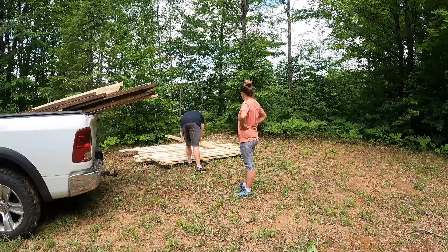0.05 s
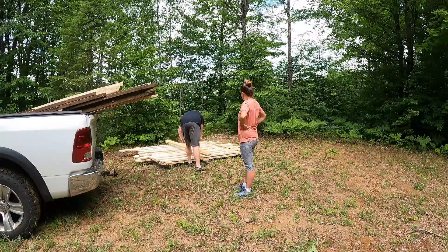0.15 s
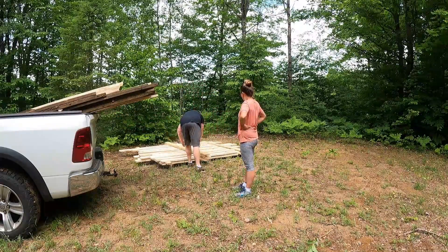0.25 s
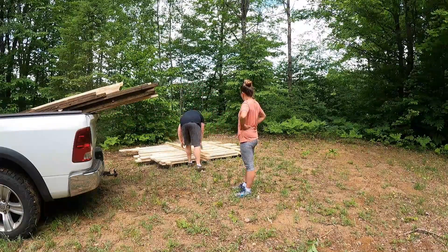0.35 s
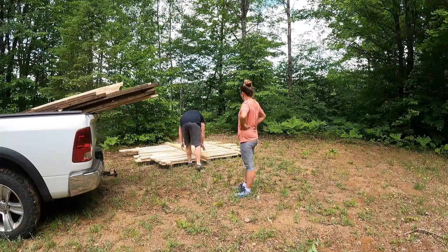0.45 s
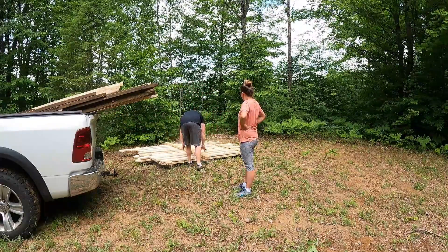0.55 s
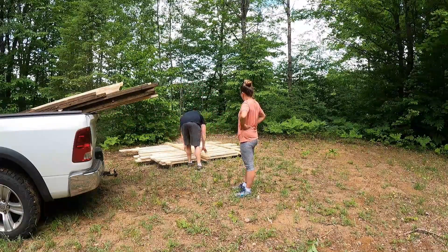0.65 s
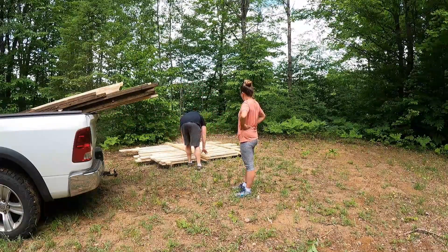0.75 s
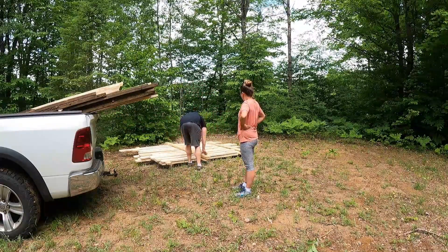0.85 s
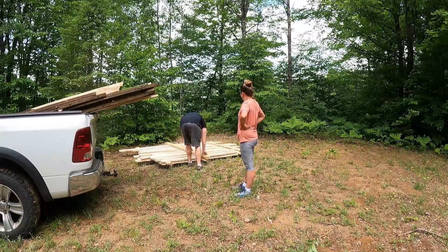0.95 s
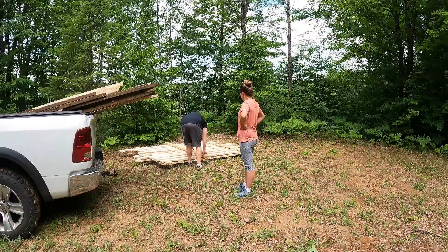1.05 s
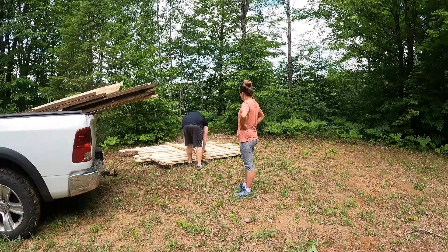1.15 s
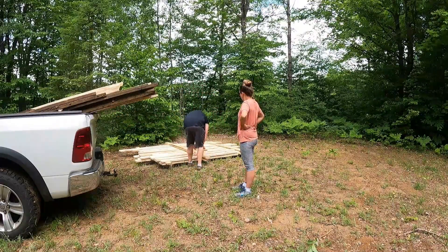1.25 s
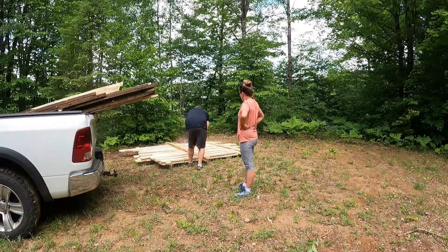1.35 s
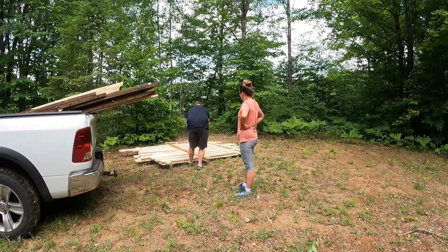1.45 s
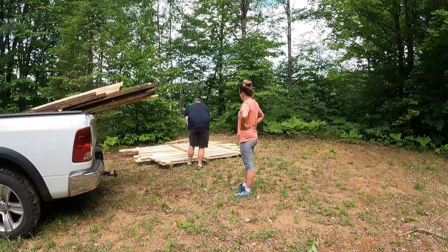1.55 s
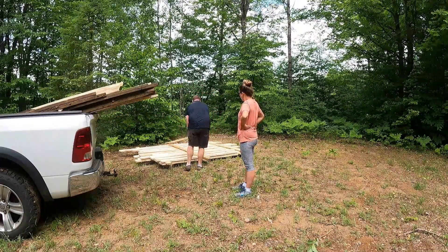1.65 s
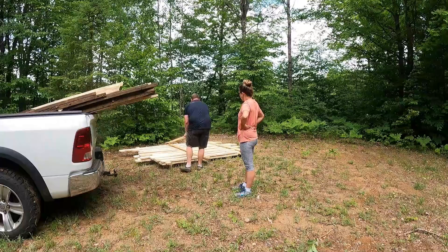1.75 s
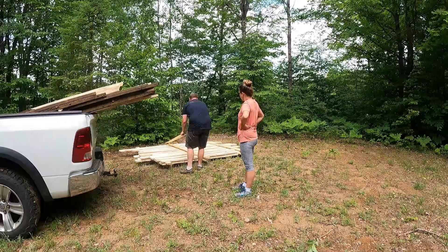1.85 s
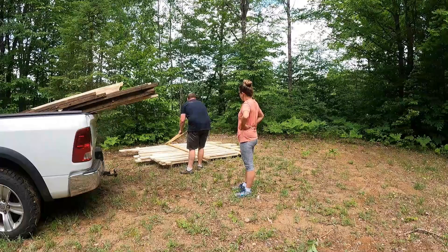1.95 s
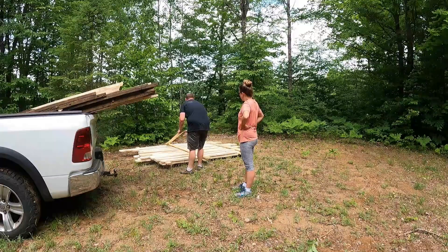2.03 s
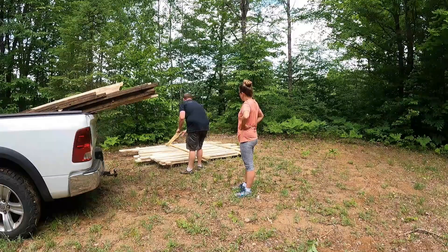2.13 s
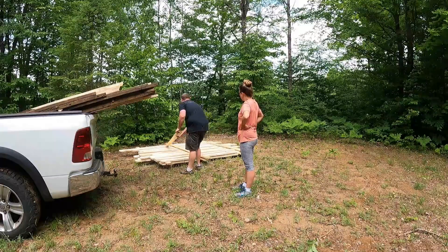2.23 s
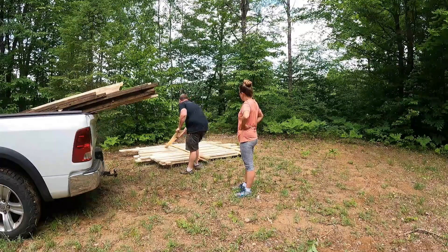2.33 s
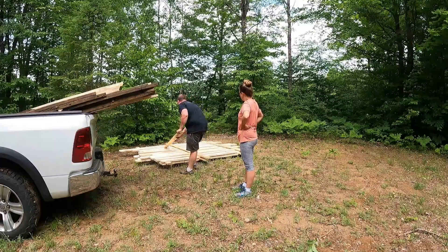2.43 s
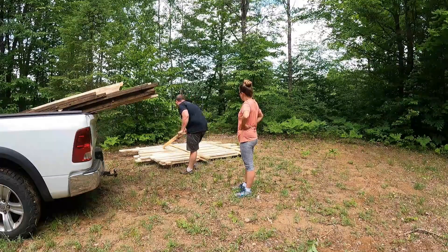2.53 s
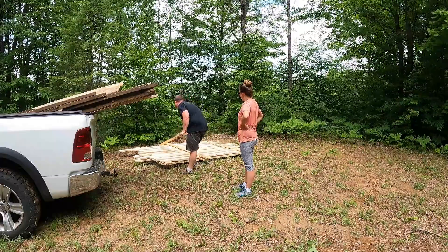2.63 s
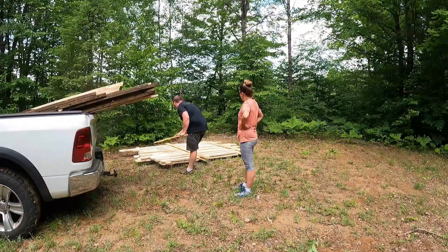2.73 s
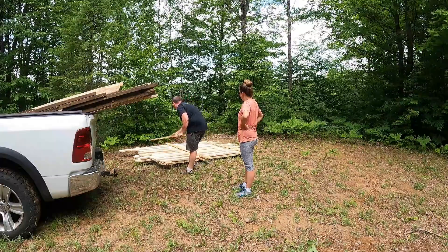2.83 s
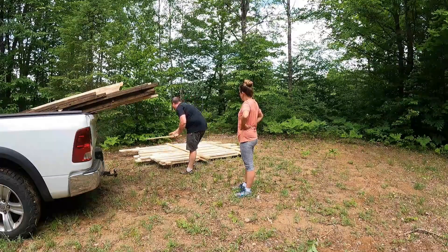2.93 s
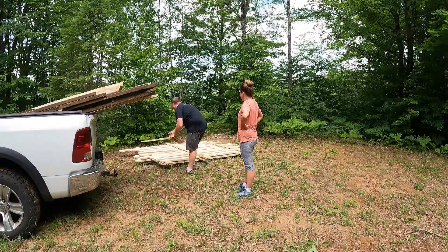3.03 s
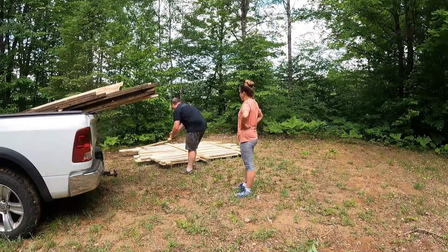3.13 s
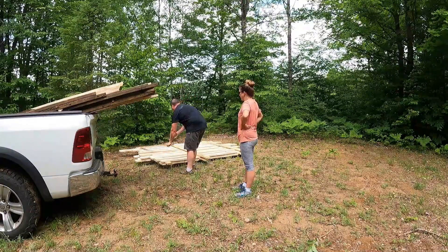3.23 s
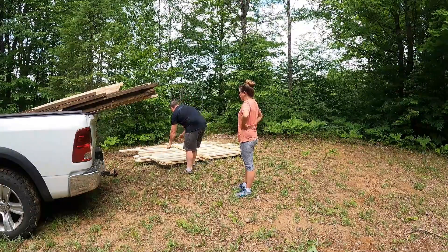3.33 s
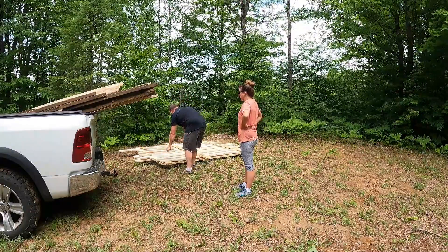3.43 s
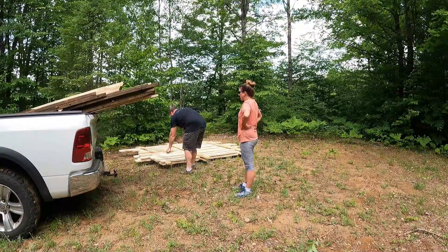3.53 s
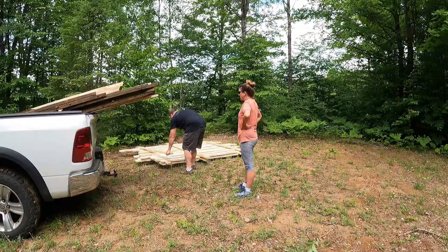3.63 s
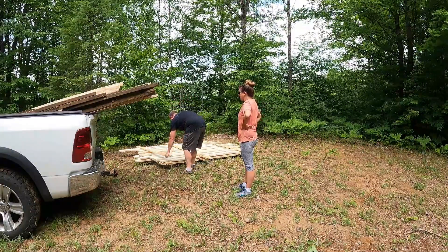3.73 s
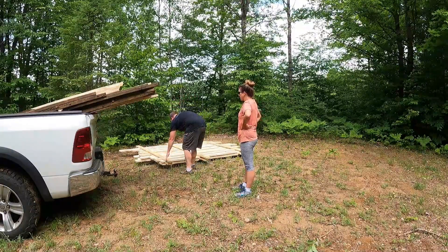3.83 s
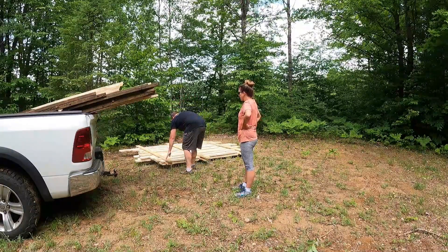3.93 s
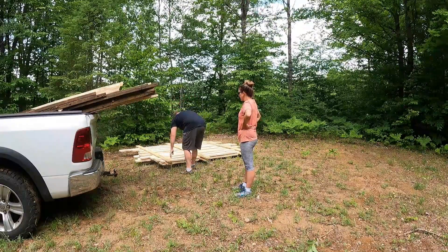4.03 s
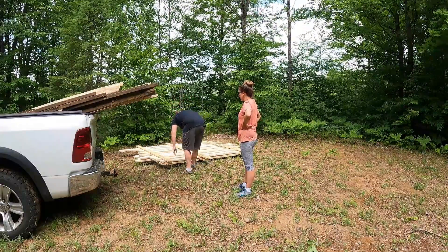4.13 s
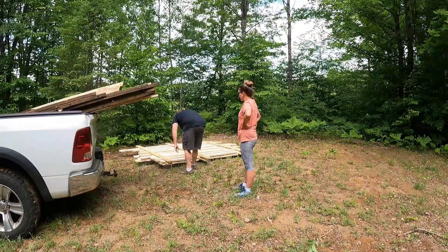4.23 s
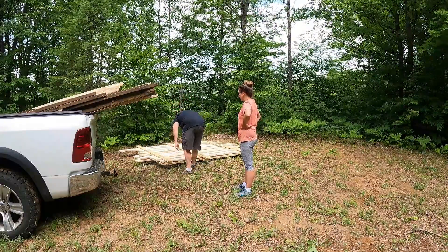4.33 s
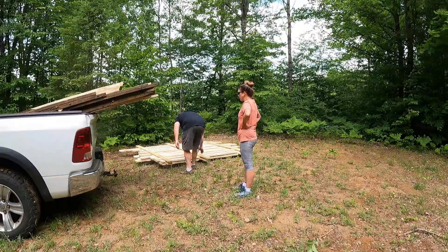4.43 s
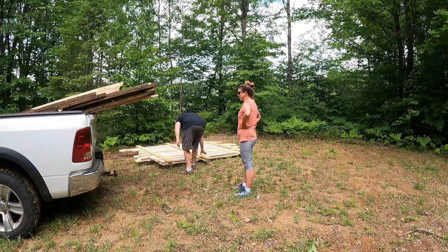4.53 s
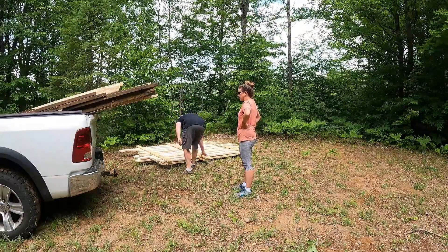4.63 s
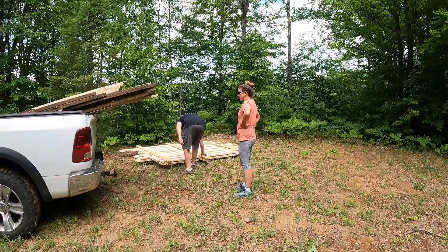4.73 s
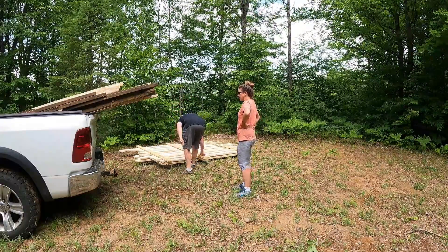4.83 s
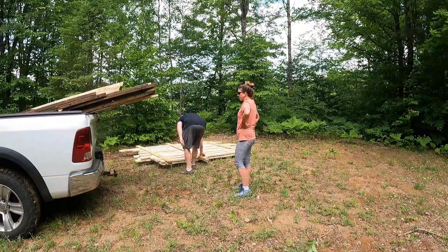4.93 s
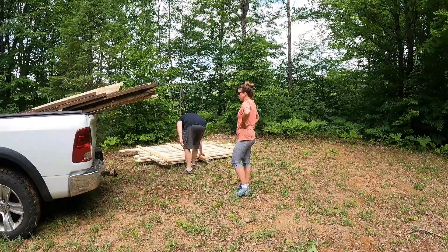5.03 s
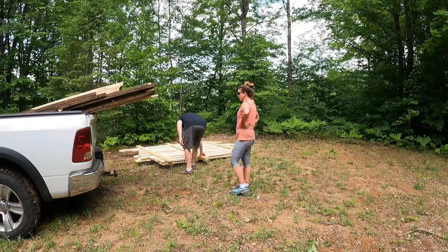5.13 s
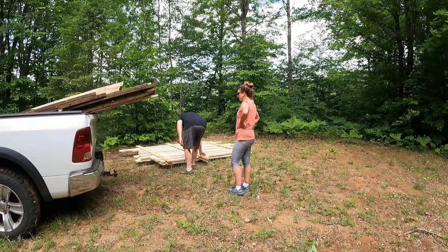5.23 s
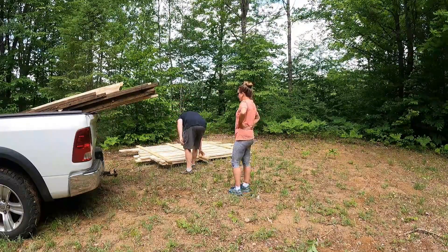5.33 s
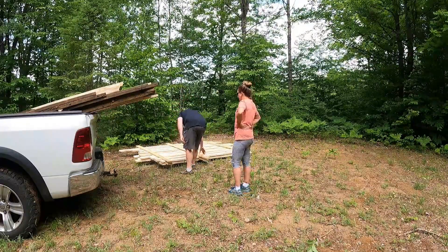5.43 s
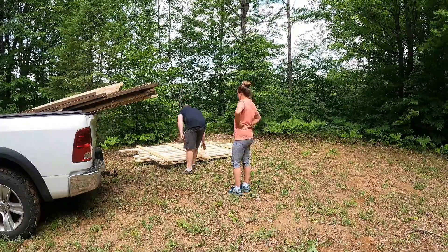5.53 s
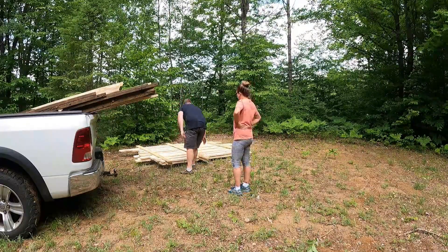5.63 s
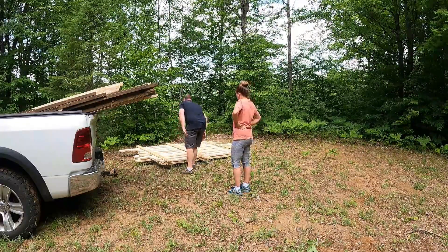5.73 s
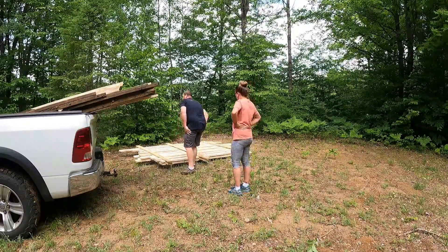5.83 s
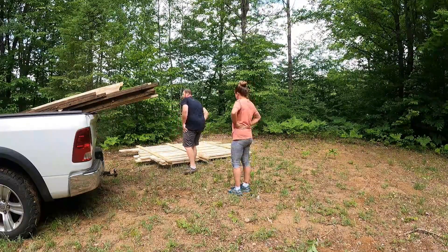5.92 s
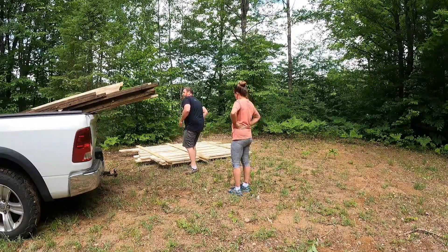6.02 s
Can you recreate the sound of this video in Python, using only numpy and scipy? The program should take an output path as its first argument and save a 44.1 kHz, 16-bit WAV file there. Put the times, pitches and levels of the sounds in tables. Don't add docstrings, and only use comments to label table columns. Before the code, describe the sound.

Rough boards clatter hard onto a wooden stack in a forest clearing, then scrape, knock and settle over soft leaf hiss.

```python
import sys
import numpy as np
from scipy import signal
from scipy.fft import rfft, irfft, next_fast_len
from scipy.io import wavfile
from scipy.ndimage import uniform_filter1d

SR = 44100
rng = np.random.default_rng(int(sys.argv[2]) if len(sys.argv) > 2 else 0)


def materialize(psi):
    bounded = np.clip(np.atleast_2d(psi).T, -1, 1)
    quanta = np.round(bounded * 32767).astype(np.int16)
    wavfile.write(sys.argv[1], SR, quanta)


def decibels_to_gain(level_db):
    exponent = np.asarray(level_db, float) / 20
    return 10 ** exponent


N = 267863
T = np.arange(N) / SR


def unit(x):
    return x / np.sqrt(np.mean(x ** 2))


def spread(mid, side):
    return mid + side * np.array([[1], [-1]])


def band(x, hz, width_hz):
    n = next_fast_len(x.shape[-1], real=True)
    f = np.arange(n // 2 + 1) * SR / n + 1e-3
    response = 1 / (1 + 1j * (f - hz ** 2 / f) / width_hz)
    return irfft(rfft(x, n) * response, n)[..., :x.shape[-1]]


def colour(x, table):
    n = next_fast_len(x.shape[-1], real=True)
    f = np.arange(n // 2 + 1) * SR / n + 1
    hz, db = np.transpose(table)
    gain = decibels_to_gain(np.interp(np.log(f), np.log(hz), db))
    return irfft(rfft(x, n) * gain, n)[..., :x.shape[-1]]


def walk(rate_hz):
    k = int(SR / rate_hz)
    steps = np.repeat(rng.standard_normal(N // k + 1), k)
    return unit(uniform_filter1d(uniform_filter1d(steps, k), k)[:N])


def grains(rate_hz, spread_db):
    hits = rng.random(N) < rate_hz / SR
    return unit(hits * rng.standard_normal(N) * decibels_to_gain(spread_db * rng.exponential(size=N)))


def ring(modes, chance, rise_s, size=12000):
    t = np.arange(size) / SR
    hz, db, t60_s = (column[:, None] for column in np.transpose(modes))
    share, detune = chance[:2 * len(hz)].reshape(2, -1, 1)
    tones = np.sin(2 * np.pi * hz * (1 + 0.019 * detune) * t)
    waves = share * decibels_to_gain(db) * tones * np.exp(-np.log(1000) * t / t60_s)
    return waves.sum(axis=0) * (1 - np.exp(-t / rise_s)) ** 2


def add(out, start_s, sound, peak_db):
    i = int(start_s * SR)
    out[i:i + len(sound)] += (sound * decibels_to_gain(peak_db) / np.abs(sound).max())[:len(out) - i]


DUCK_S, DUCK_DB, DUCK_RECOVER_S = 0.4, -13.5, 0.74


def duck_db():
    return DUCK_DB * (T > DUCK_S) * np.exp(-np.maximum(T - DUCK_S, 0) / DUCK_RECOVER_S)


# freq_hz, density_db
HISS_COLOUR = [(260, -22), (450, -10), (484, -11), (566, -8), (636, -7.5), (683, -3), (823, -7.5),
               (1300, 0.5), (1420, -0.5), (2960, -4.5), (5500, -1), (7330, -10), (9100, -20), (12000, -27),
               (14000, -43.5)]
# freq_hz, gain_db
AIR_WIDTH = [(60, -21.5), (110, -14), (200, -9), (370, -6.5), (670, -6.5), (1220, -7), (2230, -5),
             (4070, -7), (7420, -14), (13600, -4)]
# freq_hz, density_db
RUMBLE_SPECTRUM = [(15, -35.5), (25, -8.5), (81, -1), (95, -1), (114, -13.5), (145, 0), (199, -2.5),
                   (263, -7.5), (479, -17), (600, -21), (780, -52.5), (1320, -120)]
# time_s, level_db
RUMBLE_LEVEL = [(0, -61.5), (.4, -60), (1.3, -66.5), (4, -60.5), (5, -63), (6.07, -61.5)]
HISS_DB, BREEZE_DB_PER_S = -63, 0.3446


def air():
    mid, side = rng.standard_normal((2, N))
    both = spread(mid, colour(side, AIR_WIDTH))
    hiss_db = HISS_DB + BREEZE_DB_PER_S * T + duck_db() + 4.0 + 0.5 * walk(26.0)
    rumble_db = np.interp(T, *np.transpose(RUMBLE_LEVEL)) + 2.0 + 0.55 * walk(13)
    return unit(colour(both, HISS_COLOUR)) * decibels_to_gain(hiss_db) + unit(colour(both, RUMBLE_SPECTRUM)) * decibels_to_gain(rumble_db)


# peak_s, peak_db
FOOT_SHIFTS = [
    (1.86, -77.5),
    (2.48, -72.5),
    (3.36, -78),
    (5.38, -76),
]
SCUFF_REST_DB, SCUFF_RISE_DB_PER_S, SCUFF_FALL_DB_PER_S = -88.5, 76, 64


def scuff():
    steps = 0
    for peak_s, peak_db in FOOT_SHIFTS:
        fall_db = np.maximum(SCUFF_RISE_DB_PER_S * (peak_s - T), SCUFF_FALL_DB_PER_S * (T - peak_s))
        steps = steps + decibels_to_gain(peak_db - fall_db)
    mid, side = [unit(band(band(grains(5000, 1.8), 9300, 5000), 9640, 6000)) for _ in range(2)]
    return (steps + decibels_to_gain(SCUFF_REST_DB + duck_db())) * decibels_to_gain(-6.5) * spread(mid, 0.65 * side)


# start_s, peak_db, ring_hz, rebound_gap_s
TOUCHDOWNS = [(.368, -34.5, 940, 0.0052), (0.3837, -2.5, 1400, 0.0034), (.3921, -2, 1070, 0.0047),
              (0.4041, -2.5, 1493, 0.0023), (0.414, -13.5, 940, .012), (.4554, -20, 1830, .015),
              (0.5279, -12, 1012, 0.0042), (0.55, -12.5, 1230, .012), (.585, -21.5, 1184, .012),
              (0.6147, -19, 1380, .003), (.6228, -7, 1526, .006), (0.6397, -11.5, 1045, .0065),
              (0.671, -18, 1090, .006), (0.699, -41, 1120, 0.0085), (0.7356, -23, 1457, 0.048),
              (1.655, -43.5, 498, 0.0051), (2.3759, -30, 1250, 0.0021), (2.3951, -22, 982, 0.0064),
              (2.4235, -21.5, 890, 0.0064), (2.49, -43, 970, .034), (2.592, -43, 1615, .037),
              (3.3411, -11.5, 1100, 0.0025), (3.3608, -14.5, 1100, 0.00201), (3.3812, -15.5, 1030, 0.0042),
              (3.3925, -16.5, 1026, 0.019), (3.4748, -28, 960, 0.011), (3.5416, -40, 810, .01),
              (4.038, -18, 1336, .003), (4.0473, -17, 934, 0.0072), (4.062, -26.5, 543, .012)]
# from_s, crack_db (over peak), thud_db, ring_t60_s, rebound_loss_db
BOARDS_HANDLED = [
    (0, -26, -34, .03, -4),
    (.38, -11, -27, 0.022, 1.5),
    (.5, -16, -30, 0.027, 0),
    (.61, -16, -34, 0.027, 1.5),
    (1.6, -9, -55, 0.058, -3.5),
    (2.3, -18, -31, 0.031, 3.5),
    (3.3, -15.5, -25.5, 0.034, 5.5),
    (4, -42, -26.5, .02, 4.5),
]
CRACK_LOSS_DB_PER_S = 150
THUD_FOLLOWS = 0.43
REBOUND_LOSS_DB_PER_S, REBOUND_SHRINK, REBOUND_DETUNE, REBOUND_CRACK_DB = 150, 0.9, 0.14, -2


def contacts():
    rows = []
    for (start_s, db, hz, gap_s), c in zip(TOUCHDOWNS, rng.standard_normal((len(TOUCHDOWNS), 3))):
        board = [b for b in BOARDS_HANDLED if b[0] <= start_s][-1]
        from_s, board_crack_db, thud_db, t60_s, loss_db = board
        first_s = min(knock[0] for knock in TOUCHDOWNS if knock[0] >= from_s)
        bedded_db = board_crack_db - CRACK_LOSS_DB_PER_S * (start_s - first_s)
        for k, late_s in enumerate((0, gap_s, gap_s * (1 + REBOUND_SHRINK))):
            peak_db = db - k * loss_db - late_s * REBOUND_LOSS_DB_PER_S
            ring_hz = hz * np.exp(REBOUND_DETUNE * c[k] * (k > 0))
            crack_db = bedded_db + k * REBOUND_CRACK_DB
            rows.append((start_s + late_s, peak_db, ring_hz, crack_db,
                         thud_db - (1 - THUD_FOLLOWS) * peak_db, t60_s))
    return rows


# freq_hz, level_db, t60_s
BOARD_MODES = [(553.5, -3.5, 0.11), (643, 2, .07), (765, -8, .06), (940, 1.5, 0.097), (1083.5, -5.5, 0.15),
               (1183, -6, 0.042), (1280, -8, 0.041), (1368, -12.5, 0.088), (1606, 8, 0.03),
               (1787, -4, 0.027), (2096, -7.5, 0.065), (2250, -2.5, 0.037), (2635, -5.5, 0.056),
               (3820, -12.5, 0.042)]
# freq_hz, level_db, t60_s
PILE_MODES = [(71.7, -15.5, 0.36), (135, -7, 0.22), (158.7, -3, 0.17), (176, -5.5, 0.13), (219.2, -1, 0.11),
              (260, -1.5, 0.1), (312.2, -1.5, 0.16), (365.3, -2, 0.085), (439.4, -2.5, 0.06)]
DULL_PER_OCTAVE = 0.259
CONTACT_S, SOFTENING = 0.00014, 0.38


def knocks():
    out = np.zeros(N)
    rows = contacts()
    crack_t = np.arange(1024)
    crack_shape = crack_t * np.exp(-crack_t / SR / 0.0017)
    for (start_s, db, hz, crack_db, thud_db, t60_s), c in zip(rows, rng.standard_normal((len(rows), 1100))):
        t60_s = np.clip(t60_s, 0.008, 0.2)
        local = [(hz, 0, t60_s), (hz * 1.23, -5, 0.92 * t60_s), (hz * 0.76, -11, 1.1 * t60_s),
                 (hz * 1.6, -12, 0.84 * t60_s), (hz * 0.527, -17, 1.5 * t60_s), (hz * 1.4, -12, 0.7 * t60_s)]
        rise_s = CONTACT_S * decibels_to_gain(-SOFTENING * max(crack_db, -32))
        add(out, start_s, ring(local, 1 + 0.29 * c, rise_s, size=4096), db - 5.5)
        board = []
        for f, level_db, decay_s in BOARD_MODES:
            octaves = np.log2(f / hz)
            dull_db = DULL_PER_OCTAVE * crack_db * max(octaves, 0)
            board.append((f, level_db - 6 * abs(octaves) + dull_db, decay_s))
        add(out, start_s, ring(board, c[12:], 0.0009, size=4096), db - 12)
        crack = band(np.pad(c[76:] * crack_shape, (0, 1024)), 3080, 1500)
        add(out, start_s, band(crack, 1500, 3000), db + crack_db + 2.5)
        add(out, start_s, ring(PILE_MODES, c[50:], 0.0027), db + thud_db + 1.0)
    return signal.sosfilt(signal.butter(3, 5600, fs=SR, output="sos"), out)


# freq_hz, level_db, t60_s
TRUNK_ECHO = [(91.2, -11, 0.49), (203, -12, 0.8), (400, -8.5, 0.48), (800, -14.5, 0.5), (1330, -16, 0.36),
              (1400, -27.5, 3.53), (2180, -12.5, .6), (3150, -11.5, 0.82), (5600, -10.5, .55),
              (8500, -19.5, 0.24)]


def trees(x, size=65536):
    t = np.arange(size) / SR
    tail = 0
    for hz, db, t60_s in TRUNK_ECHO:
        fade = np.exp(-np.log(1000) * t / t60_s) * (1 - np.exp(-t / 0.015))
        noise = band(rng.standard_normal((2, size)), hz, 0.58 * hz)
        tail = tail + decibels_to_gain(db) * noise * fade / np.sqrt(np.sum(fade ** 2))
    mid, side = signal.fftconvolve(x[None], tail, axes=1)[:, :N]
    return spread(mid, colour(side, [(100, -28), (1000, -8.0), (3000, -3.5), (9000, -6.0)]))


# start_s, peak_db, pitch_hz
SETTLING = [(.405, -20, 176), (4.037, -25, 382), (4.044, -28, 165), (3.345, -32, 419.6), (3.544, -41, 170),
            (1.319, -53, 99), (1.921, -53, 101), (2.0, -53, 135), (2.599, -44, 208), (2.749, -60, 226),
            (3.02, -55.5, 194), (4.168, -40.5, 208), (4.577, -50, 100), (4.88, -52.5, 200.4),
            (5.121, -38.5, 178), (5.131, -39.5, 250), (5.175, -46, 210), (5.383, -42.5, 157.5),
            (5.46, -52, 147)]
THUMP_T60_S, THUMP_REF_HZ = 0.16, 170


def thumps():
    out = np.zeros(N)
    for (start_s, db, hz), c in zip(SETTLING, rng.standard_normal((len(SETTLING), 8))):
        t60_s = THUMP_T60_S * min(THUMP_REF_HZ / hz, 1)
        modes = [(hz, 0, t60_s), (hz * 1.2, -4, t60_s), (hz * 2.5, -11, 0.47 * t60_s)]
        add(out, start_s, ring(modes, 1 + 0.41 * c, 0.0018), db)
    return out


# start_s, level_db, hold_s, decay_db_per_s
SPLINTERS = [
    (.41, -43, .12, 129),
    (0.625, -49.5, 0.025, 130),
    (3.353, -53, 0.008, 400),
]


def chatter():
    grit = band(np.array([grains(4500, 0.74) for _ in range(2)]), 2800, 2600)
    mid, side = unit(signal.sosfilt(signal.butter(5, 6200, fs=SR, output="sos"), grit))
    gain = 0
    for start_s, db, hold_s, decay_db_per_s in SPLINTERS:
        gain = gain + (T > start_s) * decibels_to_gain(db - decay_db_per_s * np.maximum(T - start_s - hold_s, 0))
    return gain * spread(mid, 0.35 * side)


# start_s, peak_db, pitch_hz
SNAPS = [
    (0.8294, -51, 3660),
    (1.2346, -51.5, 5280),
    (1.451, -55.5, 5120),
    (4.164, -59, 5400),
    (4.2875, -46.5, 5830),
]


def ticks():
    out = np.zeros(N)
    fade = np.exp(-np.arange(512) / SR / 0.0013)
    for (start_s, db, hz), c in zip(SNAPS, rng.standard_normal((len(SNAPS), 512))):
        add(out, start_s, band(c * fade, hz, 0.15 * hz), db)
    return out


# start_s, peak_db, centre_hz
SHOE_BRUSHES = [
    (1.65, -46, 2470),
    (1.701, -71, 10700),
    (1.808, -68.5, 10500),
    (2.05, -67, 11000),
    (2.379, -55.5, 8900),
    (2.429, -60.5, 11000),
    (3.349, -61, 10000),
    (4.351, -70.5, 10500),
    (5.15, -69, 11000),
    (5.44, -72, 11000),
]
BRUSH_WIDTH, BRUSH_LEAST_WIDTH_HZ, BRUSH_FADE_S = 0.5, 3700, 0.031


def brush():
    out = np.zeros((2, N))
    t = np.arange(8192) / SR
    shape = t * np.exp(-3 * t / BRUSH_FADE_S)
    for (start_s, db, hz), c in zip(SHOE_BRUSHES, rng.standard_normal((len(SHOE_BRUSHES), 2, 8192))):
        width_hz = max(BRUSH_WIDTH * hz, BRUSH_LEAST_WIDTH_HZ)
        for port, noise in zip(out, spread(c[0], 0.5 * c[1])):
            add(port, start_s, band(band(noise, hz, width_hz), hz, width_hz) * shape, db)
    return out


# time_s, level_db
STROKES = [
    [(1.95, -65), (2.07, -52), (2.12, -51.5), (2.28, -40.5), (2.302, -49), (2.365, -51)],
    [(2.46, -55.5), (2.53, -52), (2.63, -52.5), (2.72, -81)],
]
# freq_hz, width_hz, level_db
DRAGGED_BODY = [(755, 38, -1), (955, 30, 1.5), (1070, 80, -3), (1410, 110, 1.5), (1553, 220, -4.5),
                (1940, 140, -6.5), (2210, 220, -11), (2700, 300, -10)]
STROKE_PILE_DB = [-13, 0]


def slide():
    rasp = grains(2500, 0.65)
    body = 0
    for k, (hz, width_hz, db) in enumerate(DRAGGED_BODY):
        body = body + (-1) ** k * decibels_to_gain(db) * band(rasp, hz, width_hz)
    body = signal.sosfilt(signal.butter(2, 2400, fs=SR, output="sos"), unit(body))
    pile = unit(sum(decibels_to_gain(db) * band(rasp, hz, 30) for hz, db, _ in PILE_MODES))
    out = 0
    for stroke, pile_db in zip(STROKES, STROKE_PILE_DB):
        time_s, db = np.transpose(stroke)
        pressure_db = np.interp(T, time_s, db, left=-120, right=-120) - 3.5
        out = out + decibels_to_gain(pressure_db) * (body + decibels_to_gain(pile_db) * pile)
    return out


def scene():
    wood = knocks() + thumps() + slide()
    wood = wood - 0.18 * band(wood, 690, 230)
    return wood + trees(wood) + chatter() + ticks() + scuff() + air() + brush()


def low_pass(x):
    return signal.sosfilt(signal.butter(12, 14160, fs=SR, output="sos"), x)


def record(dry):
    lag_samples = 0.6
    turn = np.exp(-2j * np.pi * lag_samples * np.arange(N // 2 + 1) / N)
    late = irfft(rfft(dry[0]) * turn, N)
    return low_pass(np.array([late, dry[1]]))


dry = scene()
out = record(dry)
materialize(out)
```